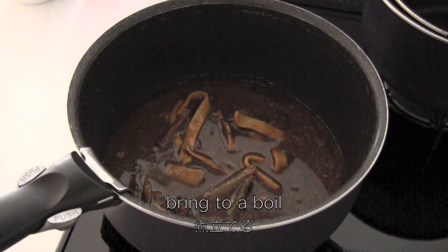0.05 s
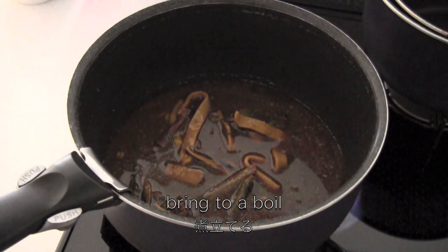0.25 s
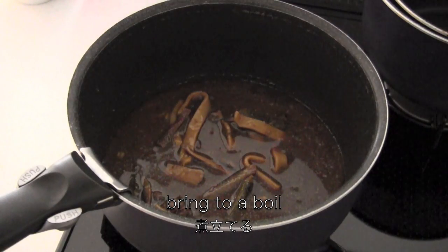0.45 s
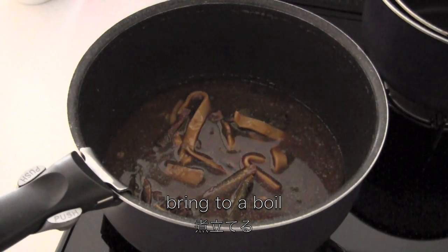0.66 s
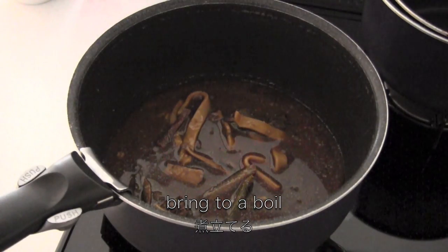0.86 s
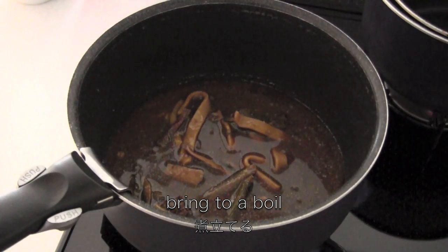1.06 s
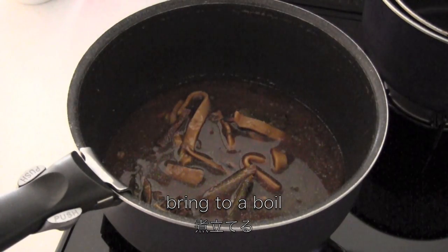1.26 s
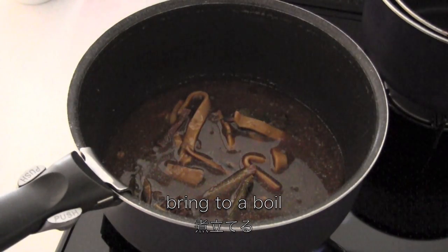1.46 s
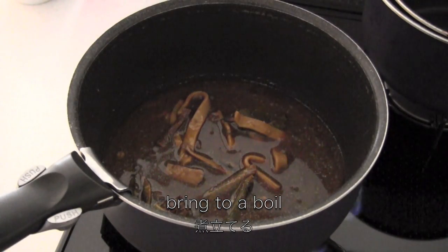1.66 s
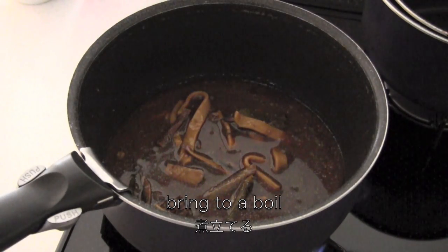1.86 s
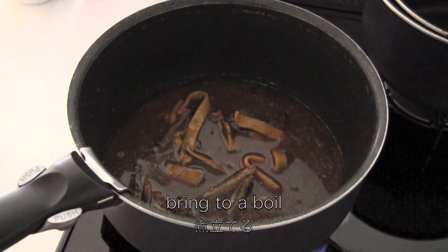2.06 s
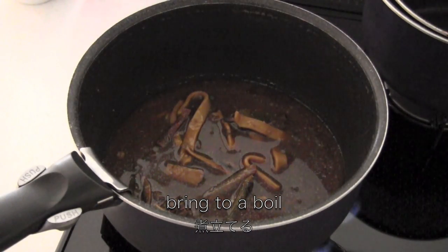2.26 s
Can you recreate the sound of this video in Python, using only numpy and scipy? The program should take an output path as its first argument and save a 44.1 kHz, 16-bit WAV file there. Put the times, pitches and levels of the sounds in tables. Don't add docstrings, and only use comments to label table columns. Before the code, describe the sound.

A gas stove igniter fires ten sharp, dry snaps, evenly spaced; after the first, gas catches with a fluttering burst of low pops under the pan. Faint hiss and fan hum, close microphone, small kitchen.

```python
import sys
import numpy as np
from scipy import signal
from scipy.io import wavfile
from scipy.ndimage import uniform_filter1d

SR = 44100
rng = np.random.default_rng(int(sys.argv[2]) if len(sys.argv) > 2 else 0)


def natural_amplitude(level_db):
    exponent = np.asarray(level_db, float) / 20
    return 10 ** exponent


def digitize_waveform(pressure):
    field = np.atleast_2d(pressure).T
    bounded = np.clip(field, -1, 1)
    quanta = np.round(bounded * 32767).astype(np.int16)
    wavfile.write(sys.argv[1], SR, quanta)


N = 101429


def evened(x):
    return x / np.sqrt(np.mean(x ** 2) + 1e-20)


def read(points, hz):
    f, value = np.transpose(points)
    return np.interp(np.log(hz + 1), np.log(f + 1), value)


def resonate(x, hz, width):
    turn = np.exp(2j * np.pi * hz * np.arange(x.shape[-1]) / SR)
    r = np.exp(-np.pi * abs(width) / SR)
    return 2 * (turn * signal.lfilter([1 - r], [1, -r], x / turn)).real


def body(x, peaks):
    return sum(natural_amplitude(db) * resonate(x, hz, width) for hz, width, db in peaks)


def pair(same, size):
    port_hz, port_width_hz, bass_hz, bass_db = 9500, 9000, 900, -6
    a, b = rng.standard_normal((2, size))
    treble = signal.lfilter(*signal.butter(4, 4800, "high", fs=SR), resonate(b, port_hz, port_width_hz))
    bass = signal.lfilter(*signal.butter(2, bass_hz, fs=SR), b)
    other = np.sqrt(1 - np.clip(same, 0, 1)) * evened(treble + natural_amplitude(bass_db) * bass)
    return np.array([a + other, a - other]) / np.sqrt(1 + np.mean(other ** 2))


def causal(points):
    log_gain = np.log(natural_amplitude(read(points, abs(np.fft.fftfreq(2048, 1 / SR)))))
    pulse = np.fft.ifft(np.exp(np.conj(signal.hilbert(log_gain)))).real[:1024]
    return pulse / abs(pulse).max()


def placed(s, sound):
    out, at = np.zeros((2, N)), round(s * SR)
    out[:, at:at + sound.shape[1]] = sound[:, :N - at]
    return out


def sparks():
    # (time [s], peak level [dB], share of fresh scatter [0-1])
    snaps = [
        (0.2307, -13.5, 0.03),
        (0.4227, -14, 0.6),
        (0.6144, -13.5, 0.65),
        (0.8102, -15, 0.53),
        (1.0038, -14.0, 0.5),
        (1.1999, -14, 0.52),
        (1.396, -14, 0.56),
        (1.592, -14, 0.6),
        (1.7852, -13.5, 0.57),
        (1.9772, -13, 0.5),
    ]
    # (frequency [Hz], level [dB])
    colour = [(200, -55), (450, -22.5), (1100, -18), (3000, -8.5), (4300, -6.5), (10000, -1.5), (15400, -8),
              (17500, -17)]
    # (frequency [Hz], width [Hz], level [dB])
    cavities = [(654, 54, 18), (833, 83, 13), (1620, 490, 9), (2590, 127, -8), (4440, 300, 5),
                (5030, 152, -2), (5650, 760, -4.5), (5970, 520, 0.5), (6590, 87, 4), (8280, 500, 2),
                (10000, 270, 1.5), (10670, 236, 1), (11100, 230, 0), (11800, 320, 6)]
    # (delay [s], left gain [ratio], right gain [ratio])
    reflections = [(0, 1.0, .95), (.00015, 1.15, .7), (.00019, -.35, .35), (.00023, .2, -.2),
                   (.00037, .65, .9), (.00041, 0.25, -.25), (.0005, -.7, -.6), (.0013, -.65, -.75),
                   (.0037, -.7, -.55)]
    # (frequency [Hz], level below the snap [dB], t60 [s])
    hollow = [(635, -31, .05), (880, -32, .045)]
    cavities_db = -7.5
    lead = 8

    snap = causal(colour)
    snap = snap + natural_amplitude(cavities_db) * body(snap, cavities)
    usual, taps = paths(), np.arange(SR // 2)
    bounces = sum(np.outer([left, right], np.sinc(taps - lead - s * SR)) for s, left, right in reflections)
    t = taps / SR
    knock = sum(natural_amplitude(db - 60 * t / t60) * np.sin(2 * np.pi * hz * t) for hz, db, t60 in hollow)

    out = 0
    for s, db, fresh in snaps:
        fresh = np.clip(fresh, 0, 1)
        way = bounces + np.sqrt(1 - fresh ** 2) * usual + fresh * paths()
        heard = signal.fftconvolve(way, snap[None], axes=1)[:, :SR // 2] + knock
        out = out + placed(s - lead / SR, natural_amplitude(db) * heard)
    return out


def paths():
    scatter_db, scatter_t60_s, scatter_rise_s, room_db = 5.5, .032, .0012, 2.5
    t = np.arange(SR // 2) / SR
    near = pair(.9, size=SR // 2) * natural_amplitude(-60 * t / scatter_t60_s) * np.minimum(t / scatter_rise_s, 1)
    return natural_amplitude(scatter_db) * near / np.linalg.norm(near[0]) + natural_amplitude(room_db) * kitchen()


def kitchen():
    # (frequency [Hz], t60 [s])
    decay = [(400, 0.19), (1500, 0.27), (3500, 0.32), (7000, 0.25), (12000, 0.19), (16000, 0.2)]
    rise_s = .004
    hz, t, z = signal.stft(pair(.955, size=SR // 2), SR, nperseg=128)
    z = z * natural_amplitude(-60 * t / read(decay, hz)[:, None])
    tail = signal.istft(z, SR, nperseg=128)[1][:, :SR // 2]
    tail = tail * np.minimum(np.arange(SR // 2) / SR / rise_s, 1)
    return tail / np.linalg.norm(tail[0])


def pop(width_ms):
    sigma_s = max(width_ms, .1) / 2355
    return np.exp(-.5 * (np.arange(-150, 151) / SR / sigma_s) ** 2)


def flame():
    # (time [s], peak level [dB], width [ms])
    large_pops = [(.2633, -36.5, .4), (.2716, -30.5, 0.27), (.2793, -45, 0.36), (.283, -32.5, 0.85),
                  (.2895, -34.5, 0.31), (.2918, -32.5, 0.36), (.307, -34.5, 0.3), (.3085, -29, 0.29),
                  (.3108, -39, 0.34), (.3148, -37.5, 0.77), (.3183, -46, 0.33), (.331, -41, 0.76),
                  (.3518, -37, 1.3), (.372, -43, 0.43), (.3866, -41, 0.43), (.4065, -33.5, 0.91),
                  (.5225, -45, 0.43), (.5365, -40, 0.5), (.5621, -49.5, 0.73), (.5841, -43.5, 0.35),
                  (.6021, -50, .6)]
    # (time [s], level [dB])
    flutter = [(.235, -61), (.27, -50.5), (.315, -47.5), (.41, -55.5), (.45, -64), (.505, -63),
               (.53, -61.5), (.6, -59.5), (.68, -85)]
    # (frequency [Hz], width [Hz], level [dB])
    under_pan = [(103, 12.4, 17), (263.3, 60, 4), (645, 100, 3), (780, 120, 5), (1280, 250, -3),
                 (2000, 600, 3), (2760, 700, 7.5)]
    pops_per_s, spread_db, flutter_db, large_db = 400, 4.0, -3, -2.5
    low_hz, under_pan_db, room_db = 256.4, -0.5, -4

    t, out = np.arange(N) / SR, np.zeros(N)
    size = natural_amplitude(spread_db * np.minimum(rng.exponential(1, N), 2.5))
    size = size * (rng.random(N) < pops_per_s / SR)
    kind = rng.integers(0, 3, N)
    small = sum(np.convolve(size * (kind == k), pop(ms), "same") for k, ms in enumerate([.18, .35, .65]))
    for s, db, width_ms in large_pops:
        out[round(s * SR) - 150:][:301] += natural_amplitude(db + large_db) * pop(width_ms)
    strength = natural_amplitude(flutter_db + np.interp(t, *np.transpose(flutter), -120, -120))
    out = out + evened(small - small.mean()) * strength

    out = signal.lfilter(*signal.butter(1, low_hz, "high", fs=SR), out)
    out = out + natural_amplitude(under_pan_db) * body(out, under_pan)
    direct = out * natural_amplitude(np.array([[-.7], [0.7]]))
    return direct + natural_amplitude(room_db) * signal.fftconvolve(out[None], kitchen(), axes=1)[:, :N]


def gas_jet():
    # (frequency [Hz], width [Hz], level [dB])
    whistles = [(4960, 120, -25), (5710, 230, -4), (7160, 450, -7), (8430, 93, -0.5), (10500, 220, -8),
                (11700, 150, -20)]
    # (time [s], level [dB])
    strength = [(0, -70), (.2, -66), (0.799, -67.5), (1.502, -68.5), (2.3, -73)]
    hiss = evened(body(pair(0.94, size=N), whistles))
    return hiss * natural_amplitude(np.interp(np.arange(N) / SR, *np.transpose(strength)))


def tick():
    # (frequency [Hz], width [Hz], level [dB])
    knob = [(1690, 350, -8), (2650, 1100, -3), (3330, 900, 0), (5500, 1800, -8), (7250, 1200, -5),
            (9300, 1200, -8), (10800, 2300, -3), (13700, 1400, -8)]
    # (delay [s], level [dB])
    latch = [
        (0, 6),
        (.0016, 2),
        (.0052, -6),
        (.0102, -7),
    ]
    start_s, level_db, room_db, fill_db = 1.2741, -23.5, -8, -17
    rise_s, t60_s = .0005, .022

    t = np.arange(SR // 10) / SR
    shape = sum(natural_amplitude(db - 60 * abs(t - s) / t60_s) * np.clip((t - s) / rise_s, 0, 1) for s, db in latch)
    blows = pair(.95, size=len(t)) * shape
    rattle = natural_amplitude(fill_db) * blows
    for hz, width, db in knob:
        rattle = rattle + natural_amplitude(db) * resonate(resonate(blows, hz, width), hz, width)
    rattle = signal.lfilter(*signal.butter(3, 1100, "high", fs=SR), rattle)
    near = placed(start_s, natural_amplitude(level_db) * rattle)
    return near + natural_amplitude(room_db) * signal.fftconvolve(near, kitchen(), axes=1)[:, :N]


def fan_duct():
    # (frequency [Hz], width [Hz], rms level [dB])
    modes = [(105.8, 22, -65.5), (167, 37, -68.5), (257, 16, -74.5), (426.4, 35, -77.5), (888, 26, -78.5),
             (1277, 81, -74), (1773, 40, -74), (2527, 45, -78), (2870, 35, -80)]
    air = pair(1.0, size=N)
    return sum(natural_amplitude(db) * evened(resonate(resonate(air, hz, width), hz, width)) for hz, width, db in modes)


def room_hum():
    # (frequency [Hz], level [dB])
    spectrum = [(15, -57), (25, -28.5), (159, -5.5), (433, -18.5), (470, -13.5), (878, -15.5), (2900, -22),
                (14000, -31), (16500, -45)]
    # (frequency [Hz], likeness [0-1])
    likeness = [(60, 1), (240, 0.91), (950, 0.87), (3770, 0.92), (15000, 0.99)]
    level_db, drift_db = -55 - 4.5, 1.94

    frames, hz = N // 256 + 5, np.fft.rfftfreq(1024, 1 / SR)
    a, b, c, d, patches = rng.standard_normal((frames, 513, 5)).T
    patches = uniform_filter1d(patches, size=12, axis=0)
    patches = evened(uniform_filter1d(patches, size=12, axis=1))
    same = np.clip(read(likeness, hz), 0, 1)[:, None]
    left = a + 1j * b
    right = same * left + np.sqrt(1 - same ** 2) * (c + 1j * d)
    z = np.array([left, right]) * natural_amplitude(read(spectrum, hz)[:, None] + drift_db * patches)
    hum = signal.istft(z, nperseg=1024, noverlap=768)[1][:, :N]
    return natural_amplitude(level_db) * evened(hum)


def scene():
    return natural_amplitude(-2) * sparks() + flame() + gas_jet() + tick() + fan_duct() + room_hum()


def roll_off(x):
    return signal.sosfilt(signal.butter(12, 16990, fs=SR, output="sos"), x)


def record(dry):
    edge_hz, top_hz, above_edge_db, left_db = 15750, 16750, -17, -.25
    edge, top = (signal.firwin(301, hz, window=("kaiser", 10), fs=SR) for hz in (edge_hz, top_hz))
    step = edge + natural_amplitude(above_edge_db) * (top - edge)
    cut = signal.oaconvolve(dry, step[None], "same")
    return roll_off(cut * natural_amplitude(np.array([[left_db], [-left_db]])))


dry = scene()
out = record(dry)
digitize_waveform(out)
```